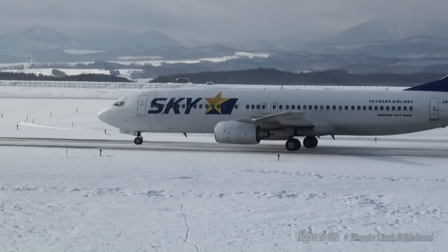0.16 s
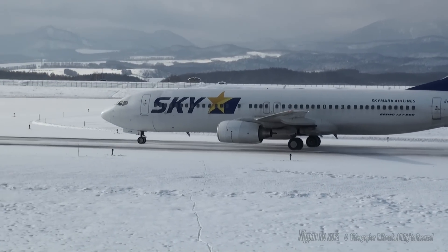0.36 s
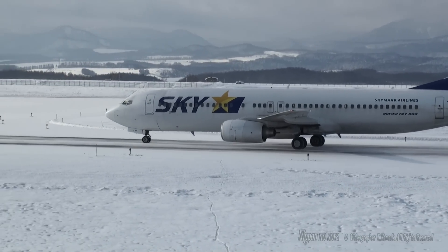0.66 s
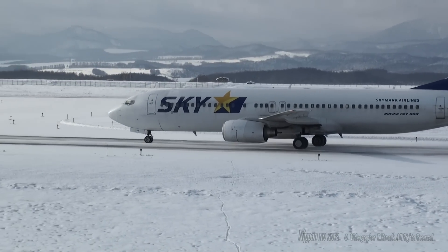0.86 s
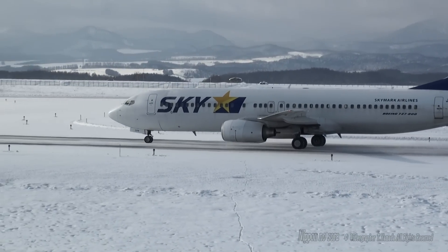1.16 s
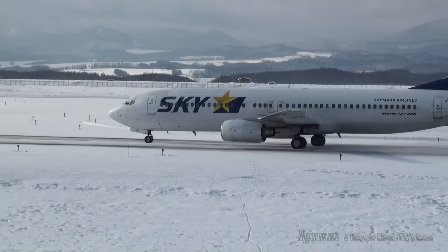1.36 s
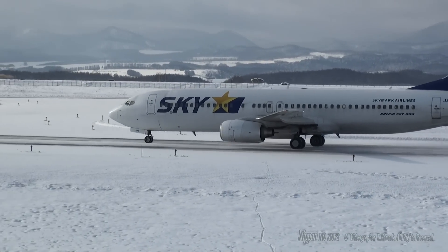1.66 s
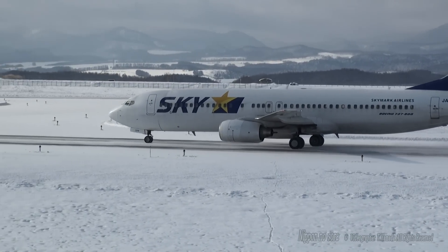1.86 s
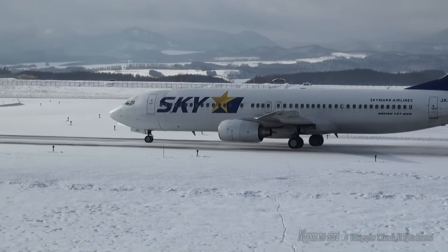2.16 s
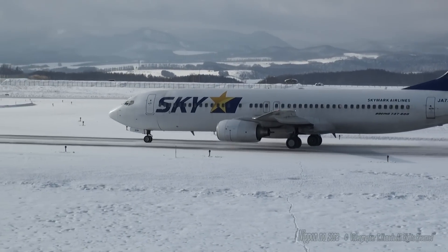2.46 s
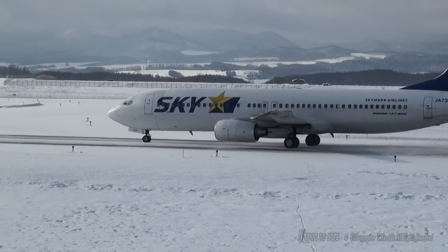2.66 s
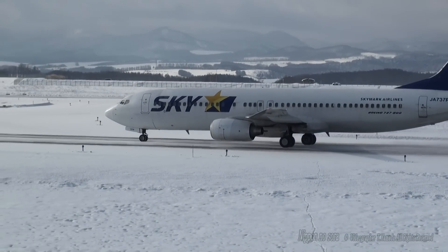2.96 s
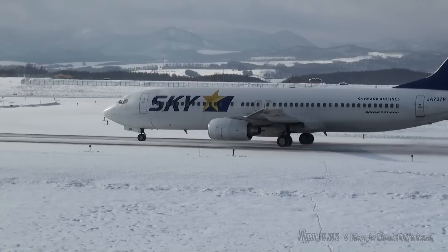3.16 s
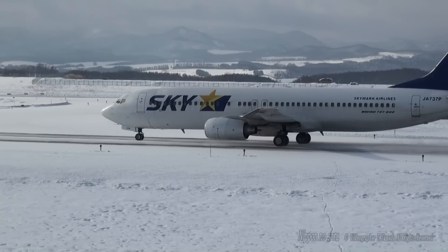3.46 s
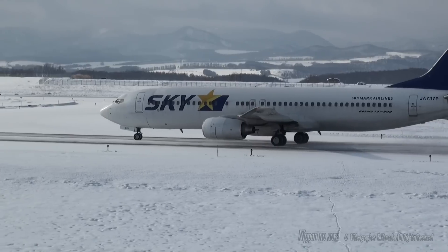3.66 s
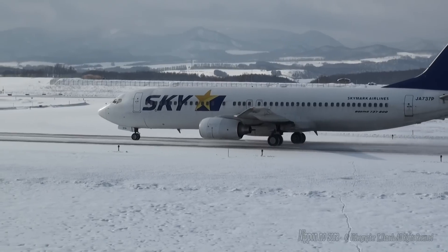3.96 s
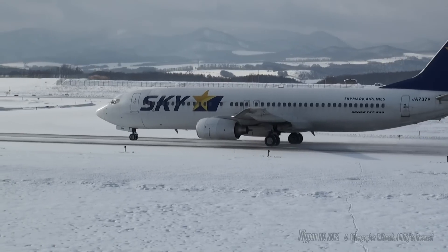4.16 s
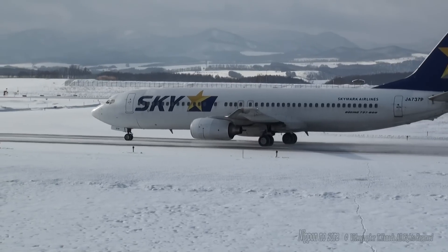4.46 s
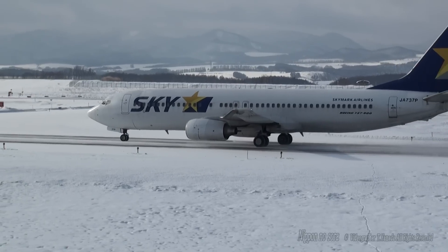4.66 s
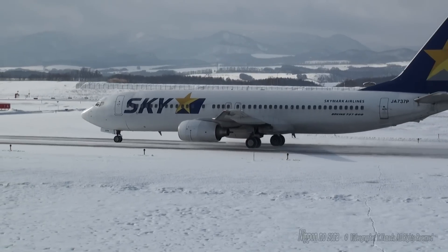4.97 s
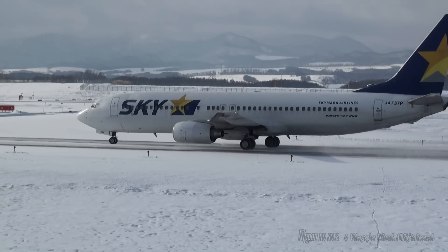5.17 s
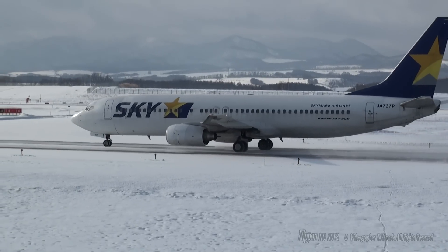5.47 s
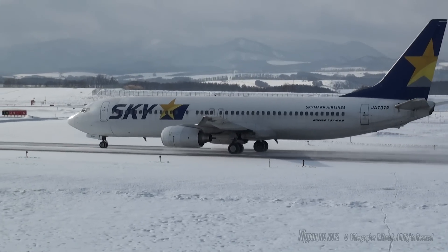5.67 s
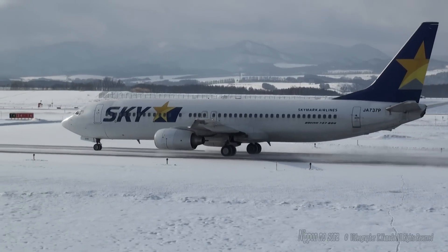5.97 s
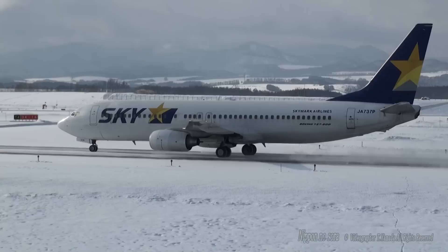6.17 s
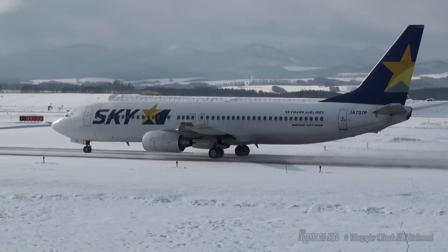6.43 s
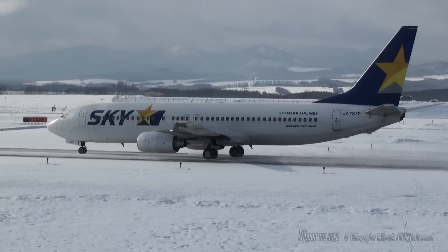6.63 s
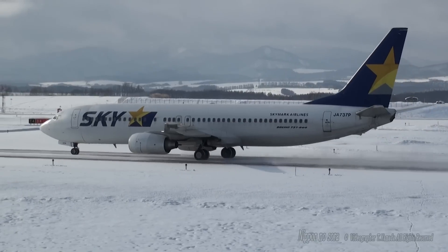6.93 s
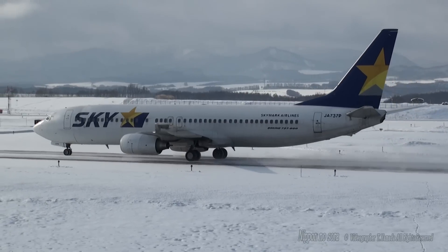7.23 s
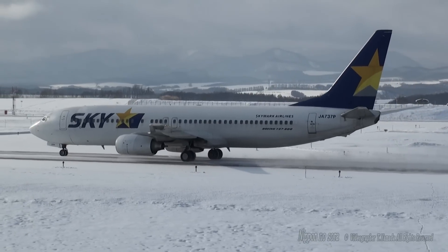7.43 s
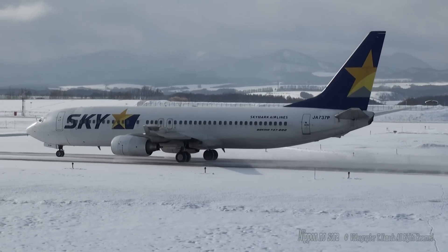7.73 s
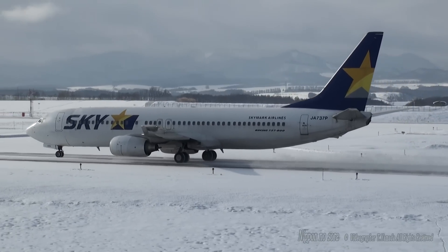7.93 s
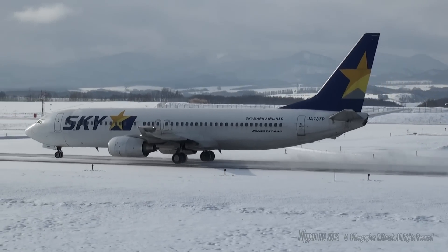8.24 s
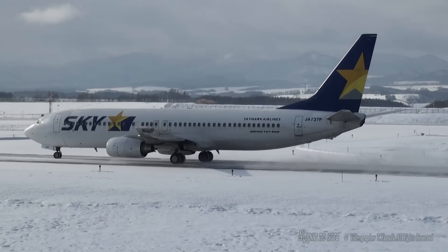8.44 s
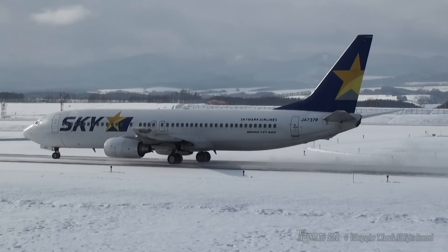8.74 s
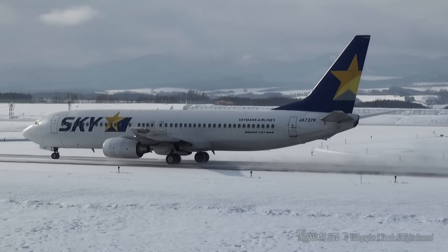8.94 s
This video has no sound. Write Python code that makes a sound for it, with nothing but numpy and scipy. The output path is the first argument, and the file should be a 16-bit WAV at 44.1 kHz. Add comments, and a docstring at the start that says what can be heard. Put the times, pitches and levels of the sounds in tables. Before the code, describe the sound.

A twin-engine airliner rolls slowly past on an open airfield, heard from far away for about nine seconds. From the start there is a continuous midrange jet roar with a hollow howl, both creeping gradually up in pitch. A rush of air and a bright intake hiss sit above, with a very faint, patchy rumble below. A high, thin whine emerges at about 1 second and is clearest from 2.3 to 6 seconds, fading in and out and sagging slightly in pitch. The roar dips a little near 3 seconds, then the howl strengthens and the sound becomes slightly louder from about 4 seconds. A second, slightly lower whine swells between 5 and 8 seconds, peaking near 6.5, and a faint higher whistle shows briefly around 6. The whines weaken toward the end while the roar and howl carry on.

```python
"""Snowy airfield: a twin-jet airliner rolls slowly past, side-on and far away.
Exhaust eddies roar and howl in a broad hump that creeps up in pitch, with a rush above.
A faint, patchy rumble lies under the roar. Intake air hisses through the fans.
Compressor blades whine over it, sagging slightly in pitch and fading in and out in the moving air.
A fast limiter holds the peaks down."""
import sys
import numpy as np
from scipy import signal
from scipy.fft import rfft, irfft
from scipy.io import wavfile
from scipy.ndimage import uniform_filter1d, minimum_filter1d, map_coordinates

SR = 44100
rng = np.random.default_rng(int(sys.argv[2]) if len(sys.argv) > 2 else 0)


def to_wav(sig):
    """Store sig (one row per channel, or 1-D mono) as 16-bit WAV at the path in sys.argv[1].

    Samples outside -1..1 are clipped; the rate is SR.
    """
    pcm = np.clip(np.atleast_2d(sig), -1, 1) * 32767
    pcm = np.round(pcm).astype(np.int16)
    wavfile.write(sys.argv[1], SR, pcm.T)  # frames by channels


N = 401310

# large-eddy roar before the pitch slide: f/Hz, relative density/dB
ROAR_SPECTRUM = [(140, -34), (185, -27.5), (215, -14.5), (245, -20), (310, -6), (385, -6.5), (460, 1),
                 (560, 1.5), (900, -1.5), (1150, -5), (1270, -6.5), (1420, -3), (1600, -10), (2000, -17.5)]
# exhaust howl before the pitch slide: f/Hz, relative density/dB
HOWL_SPECTRUM = [(480, -30.5), (600, -9.5), (700, -5.5), (800, -.5), (920, -0.5), (1010, -2), (1080, -5),
                 (1160, -4.5), (1260, -23)]
# fine-eddy rush: f/Hz, relative density/dB
RUSH_SPECTRUM = [(900, -10.5), (1350, 1), (1650, 0), (2000, 0.5), (2200, -2.1), (2600, -1), (3000, -4),
                 (3600, -7), (4300, -9.5), (5000, -16), (6000, -38)]
# faint low rumble under the roar: f/Hz, relative density/dB
RUMBLE_SPECTRUM = [(15, 8), (60, 6), (130, 8), (220, -12), (400, -30)]
# intake air: f/Hz, relative density/dB
HISS_SPECTRUM = [(3000, -3), (4600, 4), (5100, 3), (5850, -1.5), (6600, 1), (7300, -5.5), (7750, -2),
                 (8450, -8.5), (9050, -9.5), (10000, -15), (12000, -26.5), (13600, -27.5), (14650, -24),
                 (15500, -30)]
# blades chopping turbulent inflow: f/Hz, width per filter pass/Hz, start level/dB, drift/(dB/s)
INFLOW_HUMPS = [(3940, 320, -40, 0.05), (4330, 126, -38.5, -0.72), (4460, 170, -44.5, 0.47)]
# main whine swelling and fading: t/s, relative level/dB
WHINE_LEVELS = [(0.0, -46), (1.05, -43), (1.2, -36), (1.5, -42), (1.7, -33), (1.9, -39), (2.35, -26),
                (2.6, -30), (2.9, -25), (3.35, -35.5), (4.15, -29), (4.6, -33), (5.1, -27.5), (5.55, -30),
                (5.65, -27), (7.75, -38), (7.9, -35), (8.55, -40), (9.05, -36)]
# faint compressor side tones: f/main whine f, level re lower tone/dB
SIDE_TONE_LEVELS = [(1.04, -16), (1.079, -12), (1.147, -21), (1.306, -27), (1.479, -21), (1.742, -25),
                    (2.0, -29)]


def undb(db):
    """Decibels to gain."""
    return 10 ** (np.asarray(db) / 20)


def unit(x):
    """Scale to rms 1."""
    return x / np.sqrt(np.mean(x ** 2))


def lobe(t, at_s, half_width_s, peak_db):
    """Bell-shaped swell or dip in dB as a radiation lobe sweeps past."""
    return peak_db * np.exp(-((t - at_s) / half_width_s) ** 2)


def walk(rate_hz, size=2048):
    """Smooth random drift up to about rate_hz, rms 1."""
    hz = np.arange(size // 2 + 1) * SR / N
    drift = unit(irfft(rfft(rng.standard_normal(size)) / (1 + (hz / rate_hz) ** 4)))
    return np.interp(np.arange(N), np.linspace(0, N, size), drift)


def noise(spectrum, size=N):
    """Noise of the given spectrum, steep skirts beyond its ends, rms 1."""
    hz, db = np.transpose(spectrum)
    log_f = np.log(np.maximum(np.arange(size // 2 + 1) * SR / size, 1))
    outside = np.abs(log_f - np.clip(log_f, np.log(hz[0]), np.log(hz[-1])))
    gain = undb(np.interp(log_f, np.log(hz), db) - 60 * outside)
    return unit(irfft(rfft(rng.standard_normal(size)) * gain, size))


def shimmer(slow_db, quick_db):
    """Gain with random slow swell and quick flutter."""
    return undb(slow_db * walk(rate_hz=2.3) + quick_db * walk(rate_hz=16))


def large_eddies(t, spectrum):
    """Turbulence whose spectrum slides steadily upward."""
    pitch_ratio = 0.94 + 0.0108 * t
    steady = noise(spectrum, size=2 ** 19)
    return map_coordinates(steady, [np.cumsum(pitch_ratio)], order=3, mode="wrap")


def exhaust(t, lull_db):
    """Large eddies roar and howl, fine eddies rush above them."""
    swing = (1 + np.tanh((t - 3.54) / 2.4)) / 2  # nozzles turn toward the listener, 0..1
    roar = large_eddies(t, ROAR_SPECTRUM) * undb(-21.5 + lull_db)
    howl = large_eddies(t, HOWL_SPECTRUM) * undb(-19.5 + 4 * swing)
    rush = noise(RUSH_SPECTRUM) * undb(-25 + 0.7 * swing + lull_db)
    rush *= shimmer(slow_db=0.44, quick_db=0.54)  # moving air on the long path
    return roar + howl + rush


def low_rumble():
    """Faint, patchy low rumble under the roar."""
    return noise(RUMBLE_SPECTRUM) * undb(-64.5) * shimmer(slow_db=3.5, quick_db=2.0)


def intake(t, lull_db):
    """Air hisses through the fans and gathers in humps around the blade rates."""
    hiss = noise(HISS_SPECTRUM) * undb(-37.6 + lull_db)
    for hz, width_hz, start_db, drift_db_per_s in INFLOW_HUMPS:
        b, a = signal.iirpeak(hz, hz / width_hz, fs=SR)
        band = signal.lfilter(b, a, rng.standard_normal(N))
        hump = unit(signal.lfilter(b, a, band))  # second pass for steep flanks
        beam = undb(start_db + drift_db_per_s * t)  # each hump beams its own way
        hiss += beam * hump * shimmer(slow_db=1.0, quick_db=1.3)
    return hiss * shimmer(slow_db=0.8, quick_db=0.43)  # moving air


def blade_tone(hz, scatter):
    """Direct wave plus a randomly phased share scattered by the air, rms 1."""
    phase = 2 * np.pi * np.cumsum(hz) / SR
    in_phase, quadrature = scatter * walk(rate_hz=12), scatter * walk(rate_hz=12)
    return unit((1 + in_phase) * np.cos(phase) + quadrature * np.sin(phase))


def compressors(t):
    """Blade tones: the main whine settles; lower and upper tones swell as their beams sweep past."""
    running_hz, excess_hz, settle_s = 4375, 58, 3.0
    whine_hz = running_hz + excess_hz * np.exp(-t / settle_s)
    whine_db = np.interp(t, *np.transpose(WHINE_LEVELS))
    # steady scattered level: the whine breaks into wisps when faint
    whine = blade_tone(whine_hz, scatter=undb(-47 - whine_db)) * undb(whine_db + 0.5)
    lower_db = -48.5 + lobe(t, at_s=6.5, half_width_s=1.6, peak_db=11)
    lower = blade_tone(0.8931 * whine_hz, scatter=0.32) * undb(lower_db)
    upper_hz = 6999 - 0.62 * t ** 2  # sags ever faster as the aircraft gathers speed
    upper_db = -55.5 + lobe(t, at_s=5.9, half_width_s=0.35, peak_db=7.5)
    upper = blade_tone(upper_hz, scatter=0.29) * undb(upper_db)
    tones = whine + lower + upper
    for ratio, relative_db in SIDE_TONE_LEVELS:
        side = blade_tone(ratio * whine_hz, scatter=0.6)
        tones += side * undb(lower_db + relative_db + 1.5 * walk(rate_hz=0.6))
    return tones


def scene():
    """Exhaust, low rumble, intake and compressors at one distant point, mono."""
    t = np.arange(N) / SR
    lull_db = lobe(t, at_s=2.8, half_width_s=1.0, peak_db=-1.54)  # slight dip side-on
    return (exhaust(t, lull_db) + low_rumble() + intake(t, 0.64 * lull_db) + compressors(t))[None]


def limiter(x, ceiling_db, release_db_per_s, window_samples):
    """Gain drops just ahead of each peak over the ceiling, then recovers at a steady rate."""
    over_db = np.maximum(20 * np.log10(np.abs(x) + 1e-9) - ceiling_db, 0)
    ramp_db = release_db_per_s * np.arange(N) / SR
    cut_db = np.maximum.accumulate(over_db + ramp_db) - ramp_db
    held_db = minimum_filter1d(-cut_db, window_samples)
    return x * undb(uniform_filter1d(held_db, window_samples))


def record(dry):
    """Fast limiter whose ceiling eases up once, then a steep low-pass."""
    ease_s, cutoff_hz = (3.75, 4.6), 15750
    ceiling_db = np.interp(np.arange(N) / SR, ease_s, (-8.3, -6.45))
    limited = limiter(dry[0] * undb(0.5), ceiling_db, release_db_per_s=213, window_samples=45)
    lowpass = signal.ellip(10, 0.1, 80, cutoff_hz, fs=SR, output="sos")
    return signal.sosfilt(lowpass, limited)[None]


dry = scene()
out = record(dry)
to_wav(out)
```